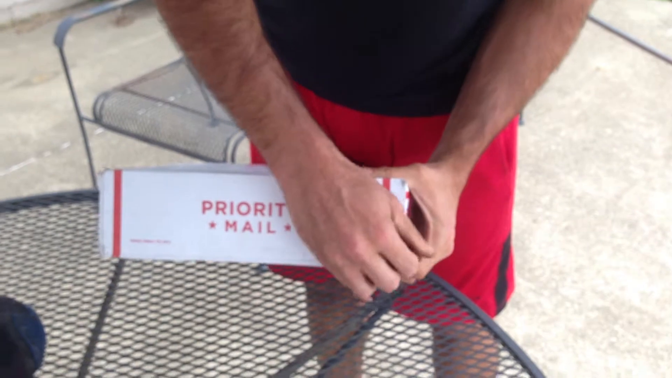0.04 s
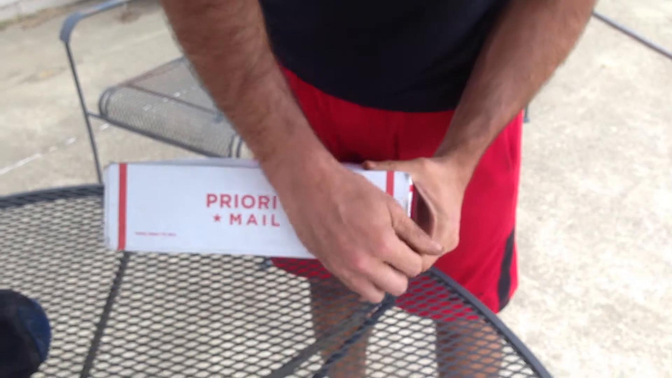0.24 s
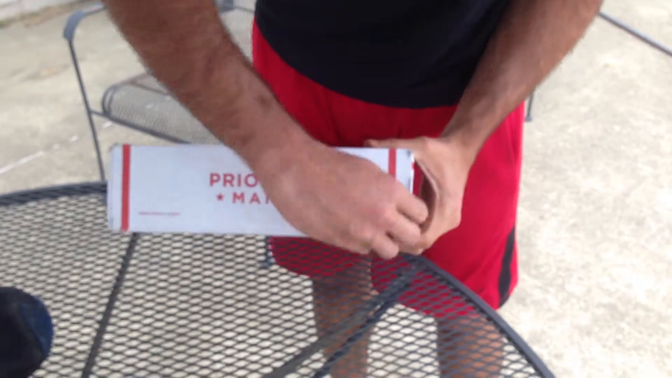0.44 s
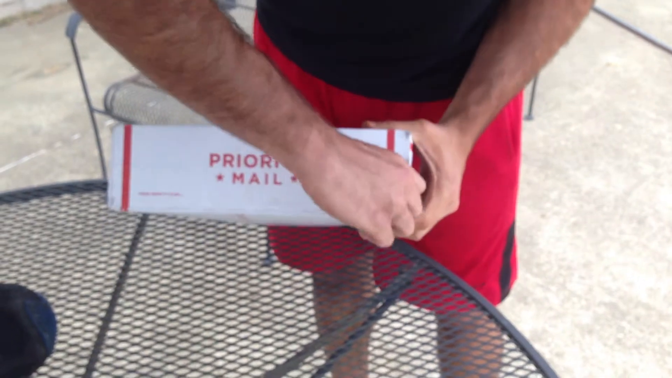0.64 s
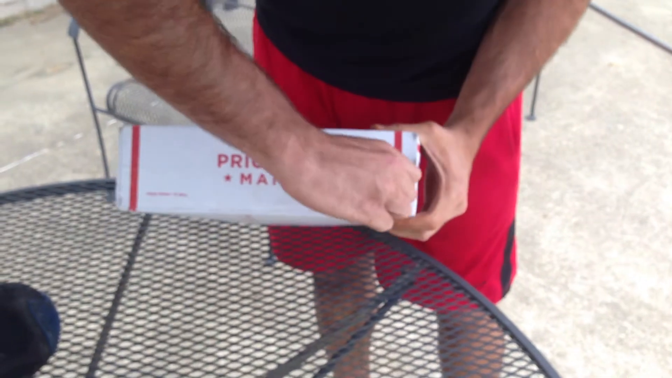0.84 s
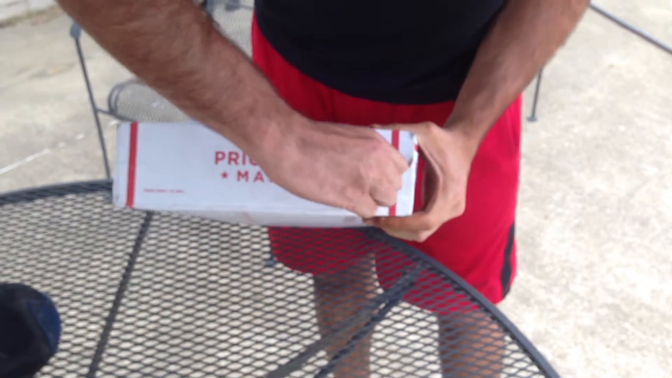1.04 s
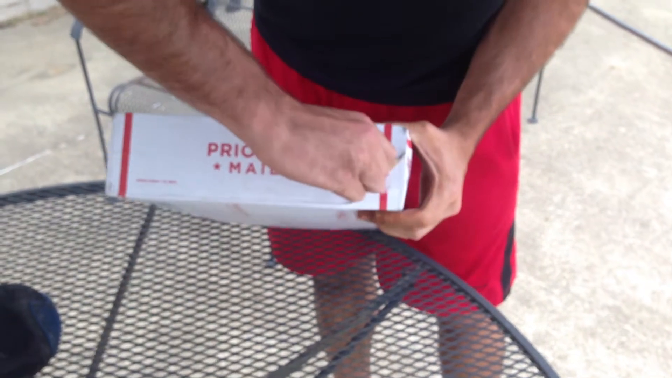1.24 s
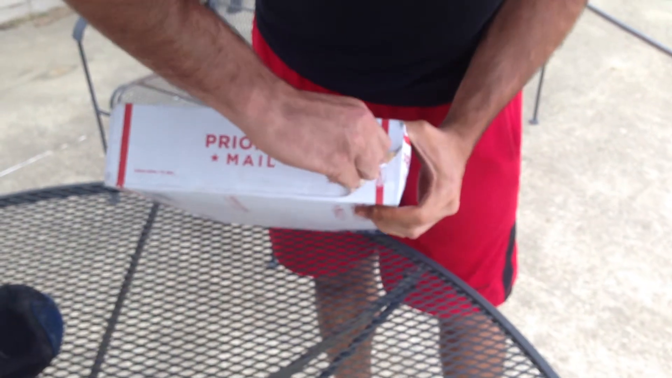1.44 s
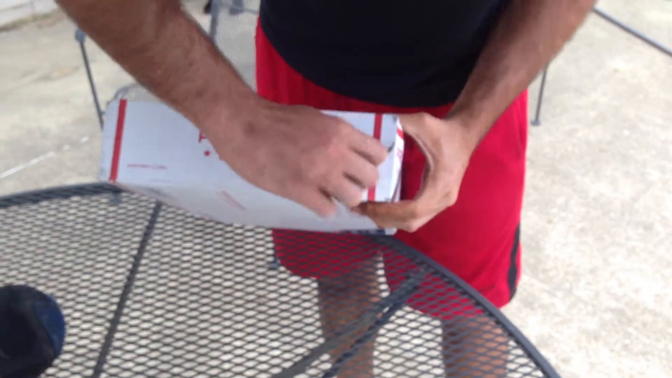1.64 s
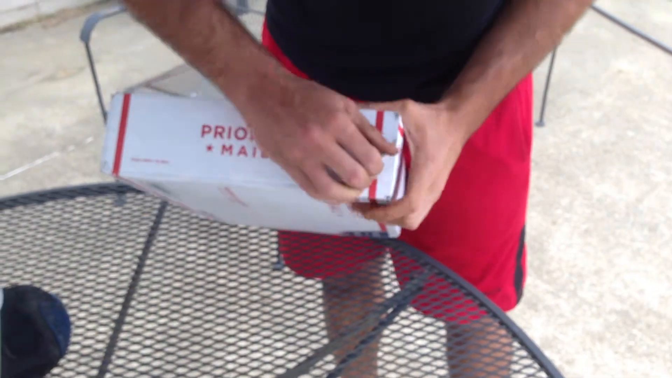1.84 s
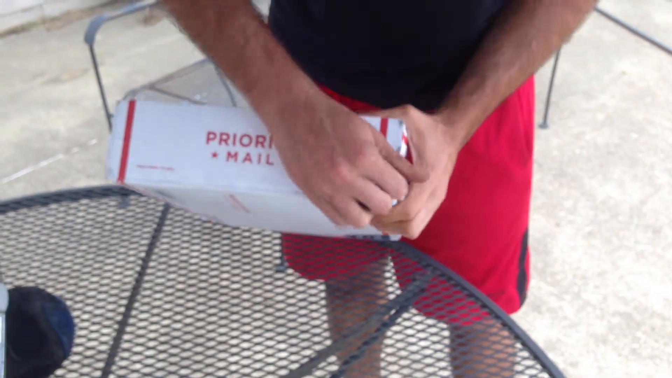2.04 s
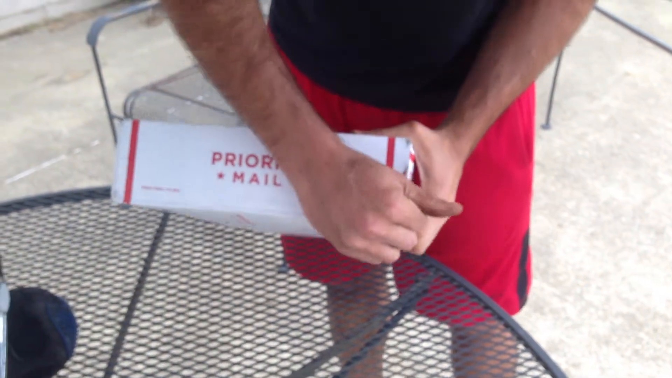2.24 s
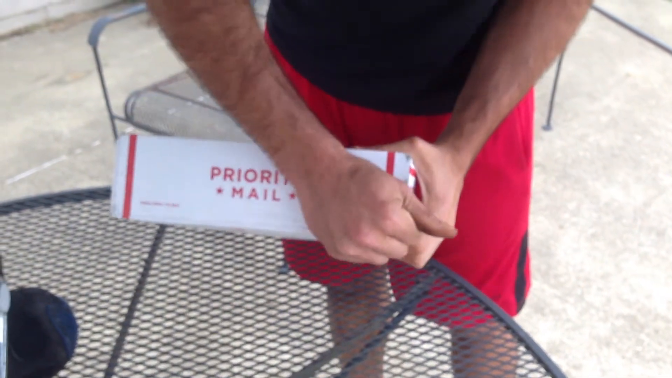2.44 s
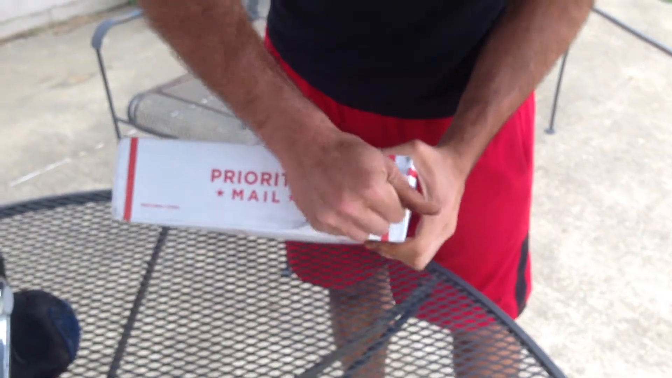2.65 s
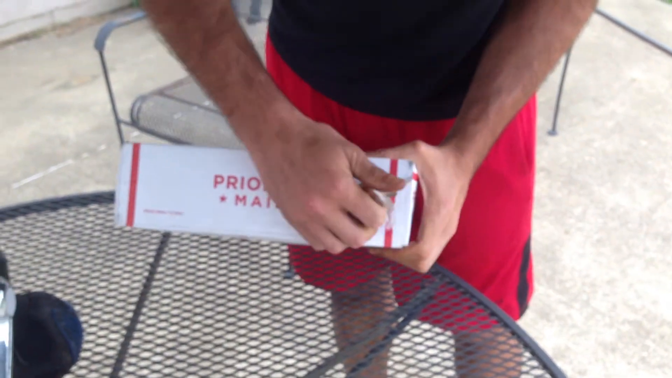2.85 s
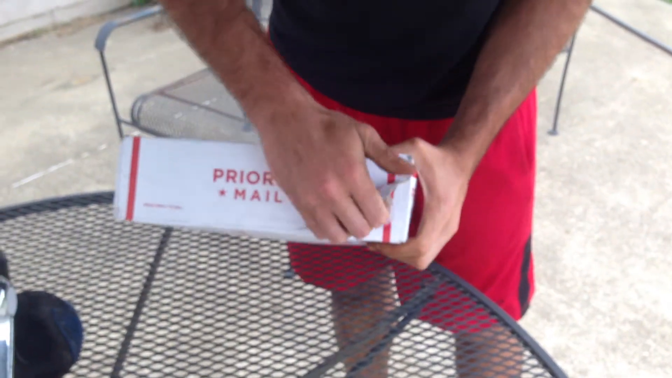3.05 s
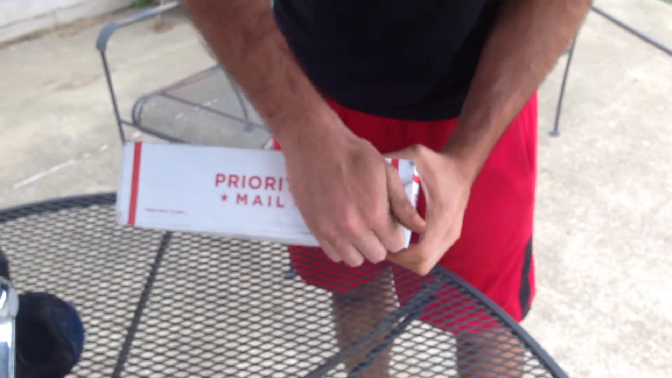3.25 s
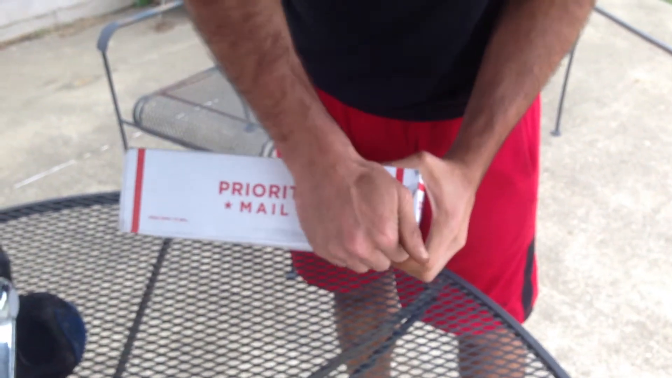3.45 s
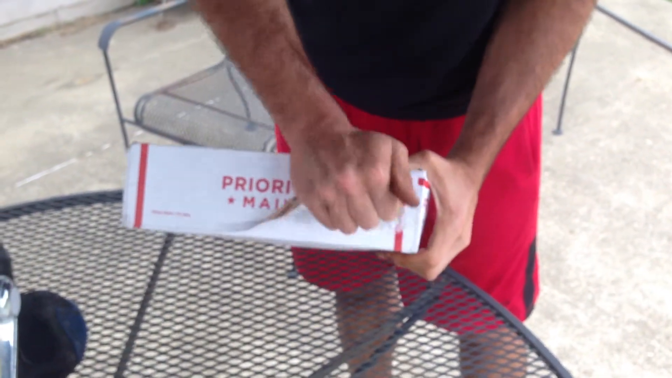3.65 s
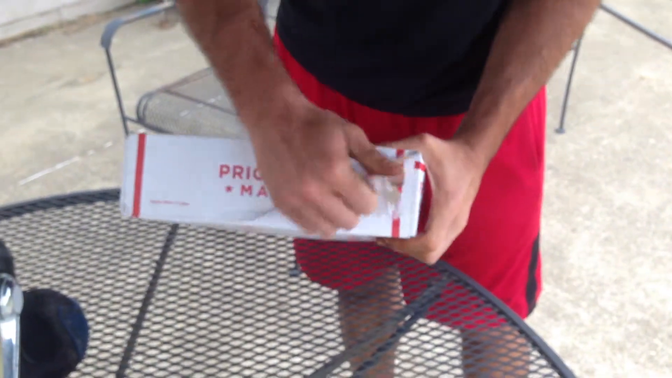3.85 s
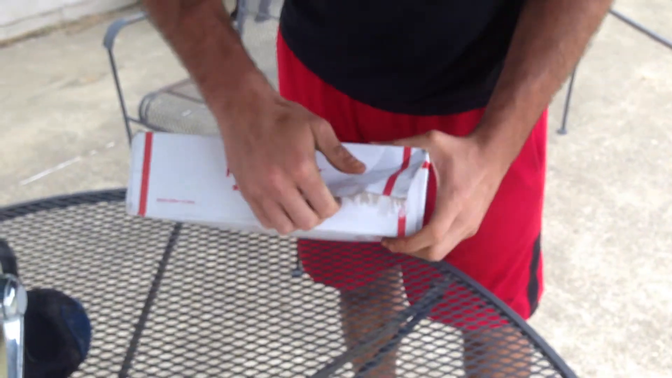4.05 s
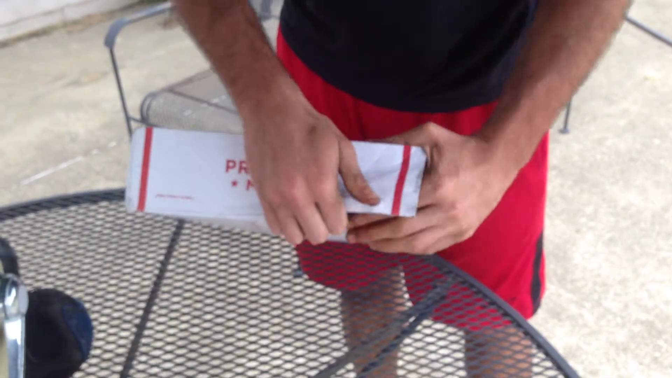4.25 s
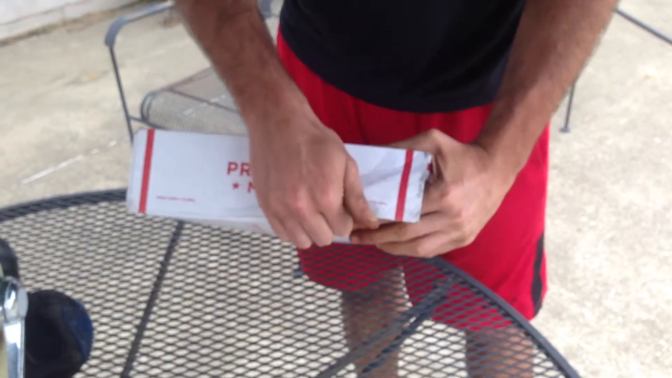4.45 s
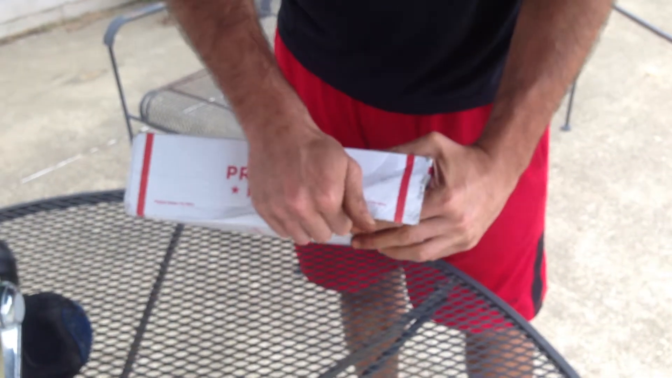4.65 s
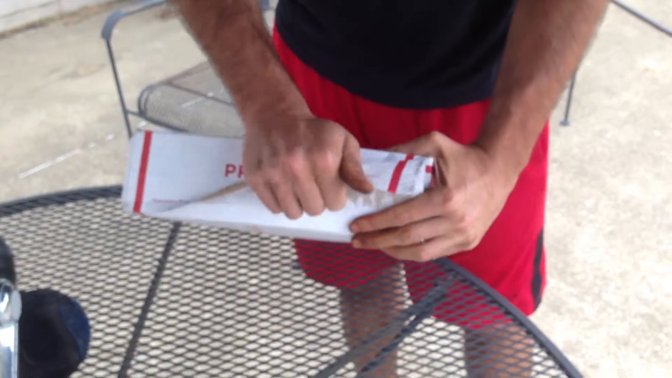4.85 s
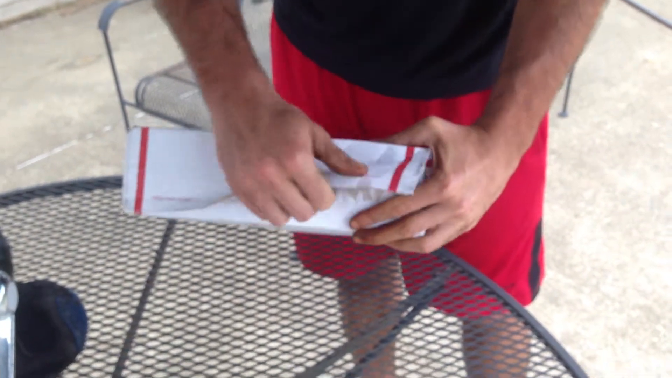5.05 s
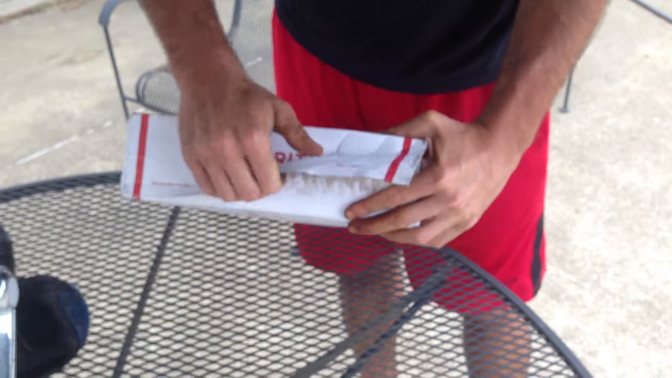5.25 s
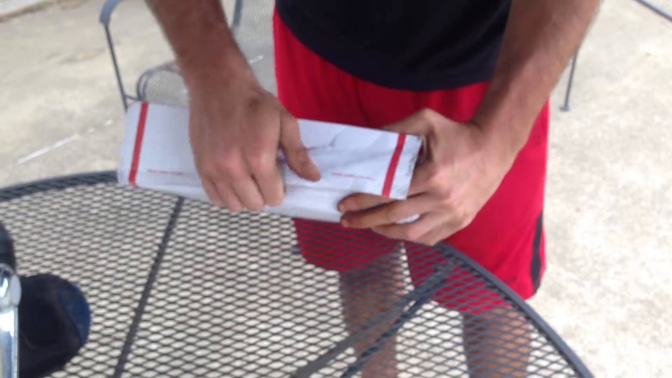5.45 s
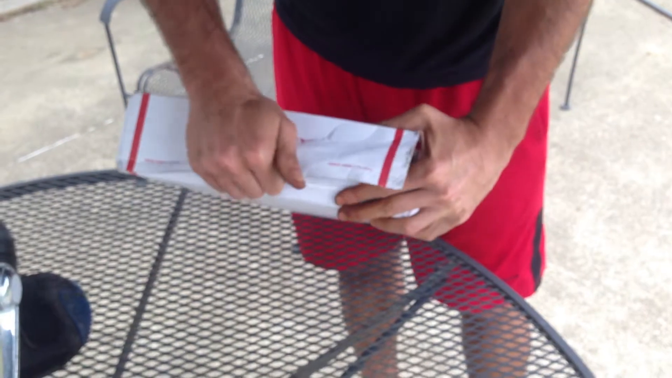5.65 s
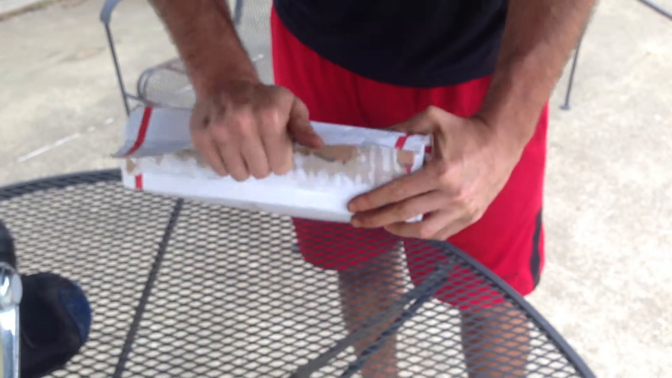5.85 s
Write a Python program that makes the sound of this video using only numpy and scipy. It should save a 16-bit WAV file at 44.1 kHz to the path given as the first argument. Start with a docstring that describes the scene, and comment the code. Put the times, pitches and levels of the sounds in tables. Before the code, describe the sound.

Light finger rubs and single cardboard pops grow into crisp cracks and short ripping runs as a glued box end comes apart outdoors.

```python
"""Two hands pull open the glued end of a thin cardboard box on a patio, close by, over a soft outdoor hush.
First the fingers rub, the board buckles and a few snaps come singly; then thin high ticks begin.
A hard, bright group of snaps follows near 2.5 s, a dense tearing run near 3.6 s, and more snaps to the end.
Each snap is a noise burst coloured as crack, panel ring, fibre fizz and a thump of the hollow box.
Rubs and tears are noise and tiny clicks in three bands; ticks are short pips; the hush is drifting noise."""
import sys
import numpy as np
from scipy import signal
from scipy.fft import rfft, irfft, next_fast_len
from scipy.io import wavfile
from scipy.ndimage import uniform_filter1d

SR = 44100
rng = np.random.default_rng(int(sys.argv[2]) if len(sys.argv) > 2 else 0)


def unload_audio(sound):
    """Save the sound as a 16-bit wav file, at the path given as the first command line argument."""
    columns = np.transpose(np.atleast_2d(sound))
    # keep every value between -1 and 1, then stretch to whole-number steps
    steps = np.round(np.clip(columns, -1, 1) * 32767)
    wavfile.write(sys.argv[1], SR, steps.astype(np.int16))


N = 260190  # length [samples]
TAPS = 4096  # length of one burst or filter [samples]
BINS = np.fft.rfftfreq(TAPS, 1 / SR)  # pitches at which filter gains are set [Hz]
AGE = np.arange(TAPS) / SR  # time since a burst began [s]


def amp(db):
    """Turns decibels into gain."""
    return 10 ** (np.asarray(db) / 20)


def evened(x):
    """Scales a signal to an rms level of 1."""
    return x / np.sqrt(np.mean(x ** 2) + 1e-20)


def smoothed(x, first, second, axis=-1):
    """Averages neighbours twice, over two widths in samples."""
    return uniform_filter1d(uniform_filter1d(x, size=first, axis=axis), size=second, axis=axis)


def read(points, hz):
    """Reads between the points of a table, along a log-frequency axis."""
    f, value = np.transpose(points)
    return np.interp(np.log(hz + 1), np.log(f + 1), value)


def add(mix, s, sound):
    """Lays a sound into the mix at time s in seconds."""
    part = mix[max(round(s * SR), 0):][:len(sound)]
    part += sound[:len(part)]


def causal(gain):
    """Makes the filter with this gain over BINS that starts as sharply as possible (minimum phase)."""
    log_gain = np.log(np.maximum(gain, gain.max() * 1e-5))
    circle = np.concatenate([log_gain, log_gain[-2:0:-1]])
    return np.fft.ifft(np.exp(np.conj(signal.hilbert(circle)))).real


def resonance(hz, q):
    """Gain over BINS of one damped resonance; a higher q is narrower."""
    f = BINS + 1
    return 1 / np.sqrt(1 + (q * (f / hz - hz / f)) ** 2)


def band(low_hz, high_hz, order=4):
    """Gain over BINS of a band with soft edges."""
    f = BINS + 1
    low_edge = 1 + (low_hz / f) ** (2 * order)
    high_edge = 1 + (f / high_hz) ** (2 * order)
    return 1 / np.sqrt(low_edge * high_edge)


def sized(gain, drive, db):
    """Scales a colour so that the drive, passed through it, has the energy of 10 ms at db."""
    energy = np.sum(irfft(rfft(drive) * gain) ** 2)
    return gain * amp(db) * np.sqrt(SR / 100 / energy)


# colour of the outdoor hush; only its shape counts: (frequency [Hz], relative level [dB per Hz])
HUSH_COLOUR = [(20, -45), (45, -18), (85, -22), (148, 3), (250, -12), (320, -10.5), (510, -16), (590, -11),
               (700, -28), (1080, -16.5), (1900, -23), (2360, -16.5), (3100, -25), (5400, -28.5),
               (15500, -30)]


def hush(level_db=-61, drift_db=0.4):
    """Distant outdoor noise: coloured noise whose level drifts in soft patches of time and pitch."""
    hz, _, z = signal.stft(rng.standard_normal(N), SR, nperseg=2048)
    patches = smoothed(rng.standard_normal(z.shape), 40, 1, axis=0)
    patches = evened(uniform_filter1d(patches, size=6, axis=1))
    z = z * amp(read(HUSH_COLOUR, hz)[:, None] + drift_db * patches)
    return amp(level_db) * evened(signal.istft(z, SR, nperseg=2048)[1][:N])


# how long the patio echoes at each pitch: (frequency [Hz], time to fall by 60 dB [s])
PATIO_DECAY = [(150, 0.62), (600, 0.062), (2200, 0.32), (6000, 0.21), (15000, 0.19)]


def patio(x, wet_db=-19, build_s=0.0018):
    """Ground, furniture and house wall return a short, thin tail of scattered echoes."""
    echoes = rng.standard_normal(SR // 2) * (rng.random(SR // 2) < 3000 / SR)  # about 3000 a second
    hz, t, z = signal.stft(echoes, SR, nperseg=256)
    decay = amp(-60 * t / read(PATIO_DECAY, hz)[:, None])
    build = 1 - np.exp(-(t / build_s) ** 2)
    tail = signal.istft(z * decay * build, SR, nperseg=256)[1]
    return amp(wet_db) * signal.fftconvolve(x, tail / np.linalg.norm(tail))[:N]


# thin high ticks: (time [s], peak level of the pip [dB], pitch [Hz])
TICK_TIMES = [(2.28, -30, 6900), (2.2917, -29, 6960), (2.5253, -31, 7400), (2.5307, -27.5, 7200),
              (3.8453, -35, 7500), (3.8630, -36.5, 6160), (4.3537, -33, 7850)]


def ticks(width_s=0.00016, scatter=0.024, scatter_s=0.0069):
    """Pips of two or three cycles, each trailed by faint scattered reflections."""
    out, t = np.zeros(N), np.arange(-44, 45) / SR
    noises = rng.standard_normal((len(TICK_TIMES), TAPS))
    for (s, db, hz), noise in zip(TICK_TIMES, noises):
        pip = amp(db) * np.exp(-(t / width_s) ** 2) * np.cos(2 * np.pi * hz * t)
        reflections = 2 * scatter * noise * np.exp(-AGE / scatter_s) * (AGE > width_s * 2)
        trail = (AGE == 0) + reflections
        add(out, s + t[0], signal.fftconvolve(pip, trail))
    return out


# resonances the whole box lends to snaps and tears: (frequency [Hz], width [Hz], lift or dip [dB])
BODY_RESONANCES = [(805, 176, 4.5), (1070, 310, 4), (1540, 52, 2.5), (2306, 340, 2.5), (2934, 115, 5.5),
                   (3585, 31, 6.5), (4070, 130, 1), (8410, 190, -5), (8950, 120, -6)]


def body():
    """Gain over BINS of the box's fixed resonances."""
    lift_db = sum(db * resonance(hz, hz / width) ** 2 for hz, width, db in BODY_RESONANCES)
    return amp(lift_db)


# Every movement of the hands below is (level curve [dB], (hollow, rasp, fizz) [dB], flap pitch [Hz]).
SLACK_HZ = 1550  # pitch of the unbent flap


def grip(t):
    """The hands never lie quite still: a steady, faint level."""
    return [(np.zeros(len(t)), (-67, -70, -69.5), SLACK_HZ)]


# fingers slide over the board: (middle [s], length [s], level before colour and stutter [dB], brightness [dB])
RUB_STROKES = [(0.106, 0.035, -54.5, -1), (0.23, 0.05, -64.5, 2.5), (0.363, 0.05, -57, 1),
               (0.475, 0.064, -63.5, -7.5), (0.578, 0.089, -62.5, 0.5), (0.873, 0.086, -67.5, -8.5),
               (0.984, 0.051, -64.5, 5.5), (1.2, 0.059, -68.5, 9), (1.293, 0.046, -57, -1.5),
               (1.48, 0.19, -63, 0.5), (1.72, 0.088, -61.5, -2), (1.923, 0.062, -59, 2),
               (2.081, 0.061, -59, -5.5), (2.17, 0.21, -62.5, 3), (2.817, 0.05, -62.5, 2.5),
               (3.047, 0.054, -61, -5), (3.226, 0.13, -60.5, -4), (3.43, 0.14, -59.5, 3),
               (4.115, 0.063, -60.5, -2), (4.238, 0.062, -57.5, 0), (4.332, 0.054, -53.5, -1.5),
               (4.55, 0.14, -56.5, 0), (4.73, 0.06, -66.5, 8.5), (5.09, 0.13, -56, -1),
               (5.477, 0.099, -59, -1), (5.605, 0.087, -57.5, 0)]
# colour of a rub, added to its level: (hollow [dB], rasp [dB], fizz [dB])
RUB_COLOUR = (-6.5, -2, -2.5)


def rubs(t, stutter_db=2.24):
    """Skin sticks and slips, so the smooth swell of each rub is made uneven."""
    moves = []
    for s, length, db, bright_db in RUB_STROKES:
        stutter = evened(smoothed(rng.standard_normal(len(t)), 24, 12))
        swell = 10 * np.log10(.5) * (2 * (t - s) / length) ** 2  # half power at either end
        colour_db = np.add(RUB_COLOUR, (-bright_db, 0, bright_db))
        moves.append((db + swell + stutter_db * stutter, colour_db, SLACK_HZ))
    return moves


def stroke(age, length_s, rise_db_per_s, fall_db_per_s, sag_db_per_s=22):
    """Level in dB of one pull: it takes hold, eases slowly as it runs, and stops."""
    rise = rise_db_per_s * np.minimum(age, 0)
    sag = sag_db_per_s * np.clip(age, 0, length_s)
    fall = fall_db_per_s * np.maximum(age - length_s, 0)
    return rise - sag - fall


# pulls along the seam: (start [s], length [s], hollow of the box [dB], rasp of the board [dB],
# fizz of the fibres [dB], flap pitch [Hz])
TEAR_PULLS = [(2.423, 0.061, -55, -55, -55, 1600), (2.655, 0.034, -57, -49, -44.5, 2300),
              (2.842, 0.1, -58, -54.5, -59, 1540), (3.533, 0.041, -78, -47.5, -53, 2400),
              (3.615, 0.088, -57, -46.5, -45, 2250), (3.727, 0.0097, -45, -41, -36.5, 1960),
              (3.748, 0.018, -67, -50.5, -51.5, 2250), (3.913, 0.088, -52.5, -46.5, -52, 1450),
              (4.457, 0.046, -73, -51.5, -54, 1700), (4.688, 0.015, -75, -48.5, -49.5, 1500),
              (4.8, 0.059, -56.5, -41, -41, 1350), (4.876, 0.1, -69, -49.5, -49.5, 1100),
              (5.162, 0.039, -41.5, -45, -55, 1150), (5.225, 0.033, -53.5, -52, -55, 1200),
              (5.359, 0.01, -55, -46, -57, 1130), (5.641, 0.03, -63, -46.5, -51.5, 1550),
              (5.68, 0.056, -68, -53.5, -52.5, 1390), (5.782, 0.084, -40, -37.5, -34.5, 2250),
              (5.865, 0.028, -52, -46, -39.5, 2110)]


def tears(t, rise_db_per_s=704, fall_db_per_s=450):
    """A pull tears along the seam, with its own colour and flap pitch."""
    return [(stroke(t - s, length, rise_db_per_s, fall_db_per_s), colour_db, hz)
            for s, length, *colour_db, hz in TEAR_PULLS]


# how far fraying lies from its snap:
# (hollow against thump [dB], rasp against ring [dB], fizz against the stronger of crack and fizz [dB])
FRAY_COLOUR = (-13.5, -21, -19.5)


def fraying(t, rise_db_per_s=1098, fall_db_per_s=425):
    """Fibres fray just before and after every snap and buckle."""
    moves = []
    for s, thump_db, _, ring_db, hz, crack_db, fizz_db in ruptures():
        colour_db = np.add(FRAY_COLOUR, (thump_db, ring_db, max(crack_db, fizz_db)))
        moves.append((stroke(t - s, 0, rise_db_per_s, fall_db_per_s), colour_db, hz))
    return moves


def handling():
    """Sums the power of all movements in three bands; each bends the flap by its share of the rasp."""
    t = np.arange(0, N, 32) / SR
    moves = grip(t) + rubs(t) + tears(t) + fraying(t)
    shape_db, colour_db, hz = (np.array(column) for column in zip(*moves))
    shape = amp(np.maximum(shape_db, -150)) ** 2
    colour = amp(colour_db.T) ** 2
    power = colour @ shape
    flap_hz = (colour[1] * hz) @ shape / power[1]
    curves = (*(10 * np.log10(power)), flap_hz)
    return [np.interp(np.arange(N) / SR, t, curve) for curve in curves]


def fibres(per_s=300, spread_db=4.0, q=3.13, count=18):
    """Breaking fibres: sparse clicks at each of several pitches, mostly small, each ringing briefly."""
    out = np.zeros(N)
    for hz in np.geomspace(300, 15000, count):
        chance, size, sign = rng.random(N), rng.exponential(1, N), rng.choice([-1, 1], N)
        clicks, at = np.zeros(N), chance < per_s / SR
        clicks[at] = sign[at] * amp(spread_db * np.minimum(size[at], 4))
        out += signal.oaconvolve(clicks, causal(resonance(hz, q) ** 2))[:N]
    return evened(out)


def resonate(x, hz, width_hz):
    """A resonance of gain 1 that follows the pitch curve hz."""
    turn = np.exp(2j * np.pi * np.cumsum(hz) / SR)
    r = np.exp(-np.pi * width_hz / SR)
    # shift the pitch down to zero, smooth there, and shift back
    return 2 * (turn * signal.lfilter([1 - r], [1, -r], x / turn)).real


# colour of tearing board; only its shape counts: (frequency [Hz], relative level [dB per Hz])
BOARD_COLOUR = [(60, -20), (170, 3.5), (330, 1.5), (560, -4.5), (900, -6.5), (1350, 5), (1750, 3),
                (2150, 7.5), (3100, -5.5), (4800, -5.5), (8000, -9), (11000, -16), (15500, -17.5)]


def tearing(clump_db=1.3, rub=0.51, onset_db=-59, onset_width_db=11.5, flap=0.81, flap_width_hz=330):
    """A light touch mostly rubs; a hard pull breaks fibres in clumps. Board and bending flap colour both."""
    hollow_db, rasp_db, fizz_db, flap_hz = handling()
    strain = 1 / (1.5 + np.exp((onset_db - rasp_db) / onset_width_db))
    clumps = evened(smoothed(rng.standard_normal(N), 260, 140))
    drive = (strain * fibres() + rub * rng.standard_normal(N)) / np.hypot(strain, rub)
    drive = drive * amp(clump_db * strain * clumps)
    colour = body() * amp(read(BOARD_COLOUR, BINS))
    bands = (band(64, 884), band(970, 3400), band(3300, 16700))
    hollow, rasp, fizz = (signal.oaconvolve(drive, causal(colour * gain))[:N] for gain in bands)
    rasp = rasp + flap * resonate(rasp, flap_hz, flap_width_hz)
    return evened(hollow) * amp(hollow_db) + evened(rasp) * amp(rasp_db) + evened(fizz) * amp(fizz_db)


def rupture(noise, quick, quick_s, slow, slow_s, size):
    """One break, a quick flurry of fibres giving way and a slower shiver; broadly white, so the box colours it."""
    flurry = quick * np.exp(-AGE / quick_s) / np.sqrt(quick_s * SR / 2)
    shiver = slow * np.exp(-AGE / slow_s) / np.sqrt(slow_s * SR / 2)
    burst = (AGE == 0) + noise * np.hypot(flurry, shiver)
    power = smoothed(abs(rfft(burst)) ** 2, size, size)
    return signal.fftconvolve(burst, causal(1 / np.sqrt(power + 1e-9)))[:TAPS]


def edge_echo(drive, delay_s, share):
    """Adds the wave that returns from the panel's folded edge."""
    out = drive.copy()
    add(out, delay_s, share * drive)
    return out


def panel_modes(hz, q=4.4, overtone=2.07, overtone_share=0.4, skirt=0.084):
    """Gain over BINS of a panel: its main mode, one overtone, and a weak spread of others."""
    main = resonance(hz, q) ** 2
    upper = (overtone_share * resonance(overtone * hz, 2 * q)) ** 2
    return np.sqrt(main + upper + skirt ** 2) * band(.5 * hz, 2960, order=2)


def bending(sound, lag_s=0.000705):
    """Bending waves in the board carry treble faster than bass, which softens the first peak."""
    size = next_fast_len(len(sound) + TAPS)
    hz = np.fft.rfftfreq(size, 1 / SR)
    phase = 4 * np.pi * lag_s * np.sqrt(1000 * hz)  # lag_s is the delay at 1 kHz, halved at 4 kHz
    phase = phase / 1 if lag_s is None else phase
    return irfft(rfft(sound, size) * np.exp(-1j * phase), size)


# the seam lets go; levels before the trims in snaps(): (time [s], box thump level [dB], thump pitch [Hz],
# panel ring level [dB], panel pitch [Hz], crack level [dB], fibre fizz level [dB])
SEAM_SNAPS = [(0.1009, -66, 500, -50, 2300, -43, -68), (0.1046, -33, 371, -33, 1540, -38.5, -71),
              (0.4259, -55, 192, -53, 1100, -53, -74), (0.8332, -53, 262, -49.5, 1620, -36.5, -35),
              (0.9945, -64, 285, -41, 2700, -58, -55), (0.9977, -56, 285, -40.5, 1550, -45, -48.5),
              (1.008, -70, 190, -50, 2030, -55, -50), (1.1585, -74, 300, -60, 1700, -53.5, -62),
              (1.464, -62, 300, -58, 1700, -55, -69), (1.523, -42.5, 364, -40, 2100, -49, -63),
              (1.7202, -37.5, 232, -40.5, 1180, -38, -42), (1.852, -45.5, 270, -49.5, 1330, -48.5, -64),
              (1.862, -40, 244, -61, 1270, -50, -59), (2.4304, -64, 490, -53, 1510, -42, -56),
              (2.4392, -31.5, 369, -28.5, 1500, -30, -39), (2.4711, -46, 330, -40.5, 3020, -39.5, -40.5),
              (2.5522, -57, 400, -43, 2390, -46, -39.5), (2.5694, -55, 272, -27.5, 1930, -25.5, -31),
              (2.6328, -66, 350, -27, 2920, -38, -57), (2.6377, -43, 282, -19, 2360, -16, -46),
              (2.6765, -52, 320, -34, 2210, -43, -57), (2.8669, -51, 460, -47, 1630, -45, -51.5),
              (2.893, -38, 293, -44, 2070, -44, -58), (2.9745, -36.5, 318, -36, 1210, -35.5, -46),
              (3.531, -68, 270, -37.5, 2550, -41, -44), (3.536, -50.5, 210, -33.5, 2420, -43, -36.5),
              (3.5726, -59, 250, -32.5, 2370, -36, -31.5), (3.604, -47.5, 470, -32, 2510, -30.5, -36),
              (3.6086, -65, 500, -32, 2720, -33, -20), (3.6105, -57, 420, -32.5, 1720, -29, -28),
              (3.6179, -42, 337, -38, 1850, -31.5, -36), (3.6252, -40, 259, -40, 2320, -35, -34),
              (3.6366, -47, 237, -38.5, 1480, -51, -38), (3.6568, -66, 270, -57, 1680, -34.5, -44),
              (3.673, -47, 234, -53, 2030, -39, -50), (3.6992, -56, 340, -34.5, 2190, -32.5, -38),
              (3.7269, -37.5, 322, -35, 1770, -31, -50), (3.9316, -38, 203, -33, 2120, -36.5, -50),
              (4.1131, -53, 360, -45, 1630, -50, -73), (4.4815, -53, 374, -34, 1790, -48, -50.5),
              (4.605, -39, 370, -16.5, 1480, -19.5, -35), (4.6085, -60, 470, -26.5, 2140, -42, -42),
              (4.6163, -56, 410, -27, 2270, -50, -38), (4.7873, -34.5, 376, -17.5, 1410, -28, -35.5),
              (4.8016, -45, 363, -32, 1910, -52, -54), (4.81, -40, 338, -40, 1300, -45, -42),
              (4.8424, -34.5, 276, -25, 1300, -32, -45), (5.1122, -36, 208, -36.5, 1440, -48, -54),
              (5.156, -33.5, 444, -30, 1160, -43, -47), (5.1612, -35.5, 220, -29, 1920, -39, -47.5),
              (5.3647, -46, 216, -56, 1670, -55, -53), (5.378, -59, 300, -39, 1220, -51, -62),
              (5.3849, -40, 300, -30, 1230, -41.5, -52), (5.7584, -64, 350, -35, 1350, -43, -49),
              (5.7728, -45, 238, -23, 1250, -52, -54), (5.7756, -38.5, 320, -27.5, 1900, -46, -34.5),
              (5.794, -48, 300, -32, 2110, -38, -41), (5.798, -35.5, 305, -32, 1300, -44, -39),
              (5.8087, -54, 398, -29, 2370, -31, -40), (5.8133, -55, 340, -37, 2500, -41, -41),
              (5.8333, -33, 383, -27, 2070, -39, -47), (5.8391, -44, 300, -28, 2410, -29, -41),
              (5.8538, -44, 326, -34, 2120, -46, -49)]
# the panel gives way without breaking; levels before the same trims:
# (time [s], box thump level [dB], thump pitch [Hz], panel ring level [dB])
PANEL_BUCKLES = [(1.2616, -45.5, 338, -53), (1.279, -45.5, 350, -47.5), (1.291, -43, 357, -48),
                 (1.513, -45, 375, -47), (1.5377, -39, 490, -42), (2.6535, -46.5, 208, -58),
                 (2.955, -46, 340, -56), (2.978, -33.5, 335, -36), (3.316, -56, 177, -65),
                 (3.356, -50.5, 420, -68), (3.823, -52, 447, -72), (3.966, -34.5, 257, -35),
                 (3.985, -36.5, 256, -34.5), (4.137, -49, 170, -66), (4.183, -50, 200, -62),
                 (4.9317, -55, 557, -39.5), (5.148, -46.5, 480, -41), (5.2041, -46, 256, -37.5),
                 (5.2486, -60, 262, -40.5), (5.256, -39.5, 180, -52), (5.7042, -71, 300, -46.5)]


def ruptures(buckle_hz=1180, crack_db=-16, fizz_db=-34):
    """A buckle is a snap that rings the whole panel, with crack and fizz set well below that ring."""
    buckles = [(s, thump_db, thump_hz, ring_db, buckle_hz, ring_db + crack_db, ring_db + fizz_db)
               for s, thump_db, thump_hz, ring_db in PANEL_BUCKLES]
    return list(SEAM_SNAPS) + buckles


# colours of a snap's two bright parts; only their shapes count: (frequency [Hz], relative level [dB per Hz])
CRACK_COLOUR = [(300, -21), (1800, -9), (3200, -0.5), (4600, 5.5), (6200, 1), (8500, -7.5), (16000, -48)]
FIZZ_COLOUR = [(1000, -58), (5000, -22), (8300, 4.5), (10000, -2.5), (12000, -4.5), (15500, -8)]


def snaps(thump_q=3.24, thump_lag_s=0.0011, thump_db=-1.5, ring_db=-3.0, crack_db=-5.5, fizz_db=-3.5):
    """Each rupture cracks, rings the panel it sits in, and thumps the air in the box."""
    out, box = np.zeros(N), body()
    rows = ruptures()
    noises = rng.standard_normal((len(rows), 2, TAPS))
    for (s, low_db, low_hz, mid_db, mid_hz, high_db, top_db), noise in zip(rows, noises):
        drive = rupture(noise[0], quick=1.26, quick_s=0.0026, slow=0.65, slow_s=0.0047, size=80)
        # the reflection returns in step with the panel, two cycles later
        drive = edge_echo(drive, 2 / mid_hz, share=0.079)
        panel = sized(box * panel_modes(mid_hz), drive, mid_db + ring_db)
        crack = sized(box * amp(read(CRACK_COLOUR, BINS)), drive, high_db + crack_db)
        fizz = sized(box * amp(read(FIZZ_COLOUR, BINS)), drive, top_db + fizz_db)
        bright = causal(np.sqrt(panel ** 2 + crack ** 2 + fizz ** 2))
        add(out, s, bending(signal.fftconvolve(drive, bright)))
        push = rupture(noise[1], quick=0.49, quick_s=0.0064, slow=0.39, slow_s=0.0063, size=14)
        hollow = sized(resonance(low_hz, thump_q) * band(103, 1140, order=3), push, low_db + thump_db)
        add(out, s + thump_lag_s, signal.fftconvolve(push, causal(hollow)))
    return out


def scene():
    """The box and the ticks with their patio echo, over the hush."""
    near = snaps() + tearing() + ticks()
    return (near + patio(near) + hush())[None]


def record(dry, edge_hz=15650):
    """Cuts away the treble above edge_hz."""
    low_pass = signal.firwin(401, edge_hz, window=("kaiser", 9), fs=SR)
    return signal.oaconvolve(dry, low_pass[None], "same")


dry = scene()
out = record(dry)
unload_audio(out)
```